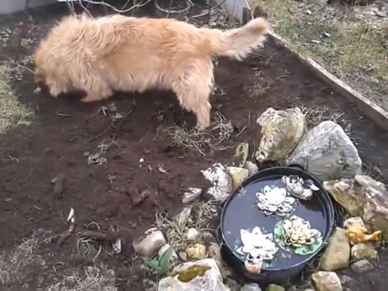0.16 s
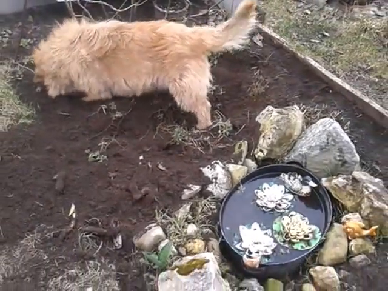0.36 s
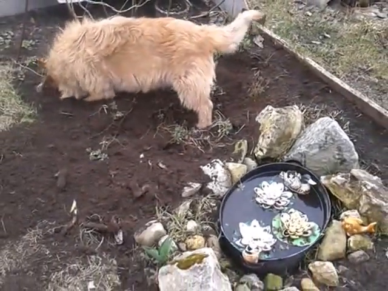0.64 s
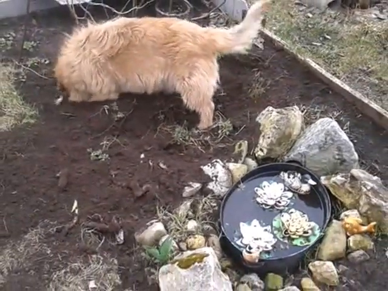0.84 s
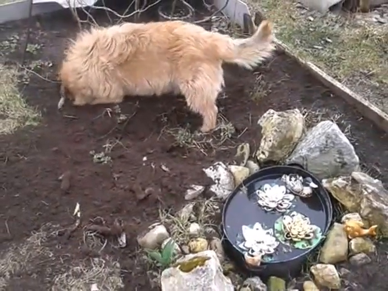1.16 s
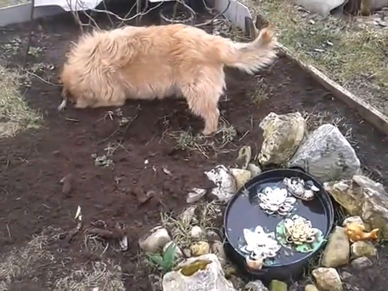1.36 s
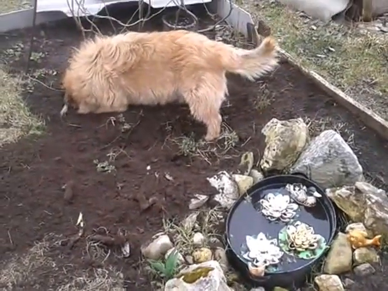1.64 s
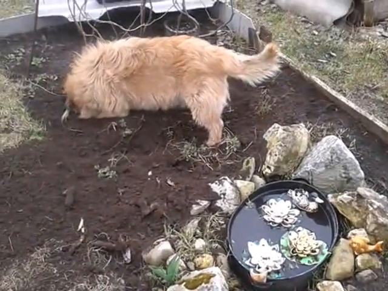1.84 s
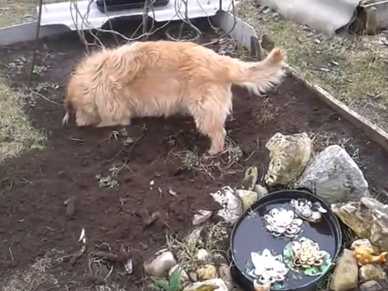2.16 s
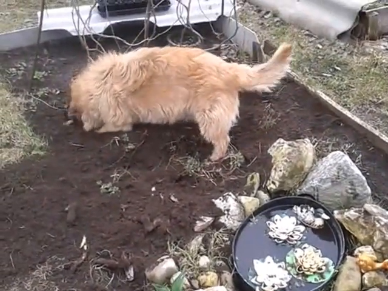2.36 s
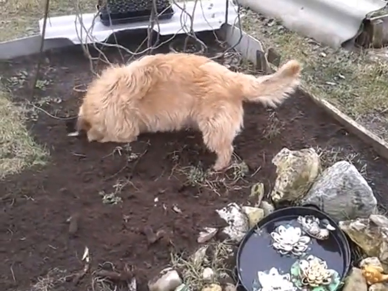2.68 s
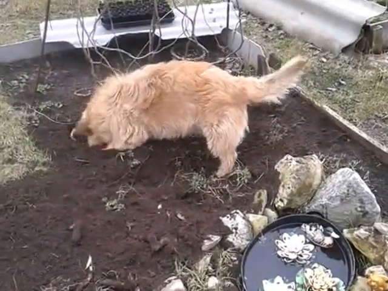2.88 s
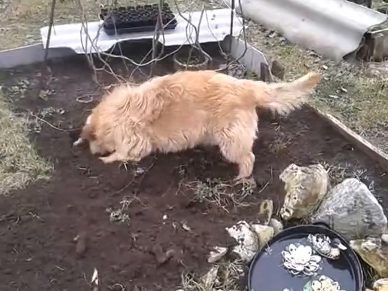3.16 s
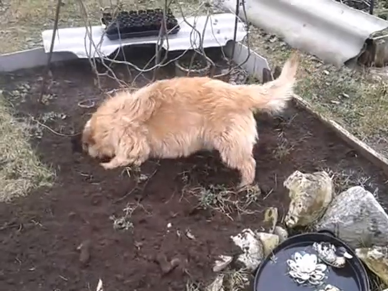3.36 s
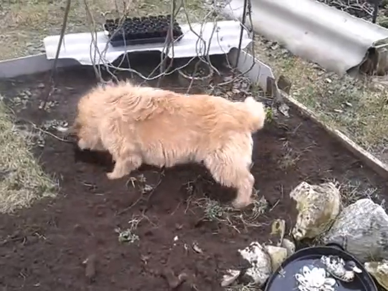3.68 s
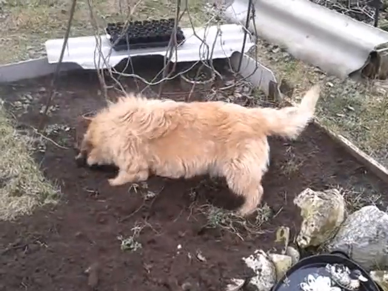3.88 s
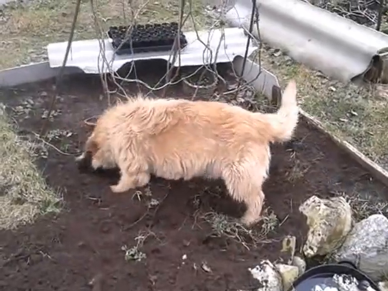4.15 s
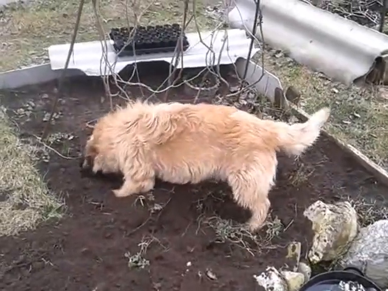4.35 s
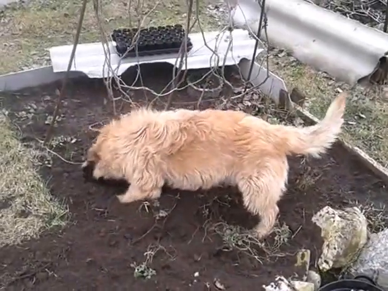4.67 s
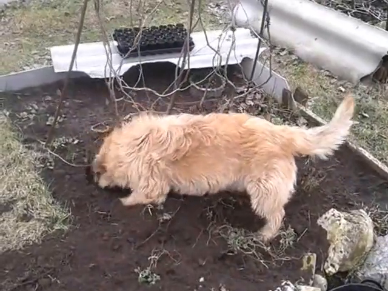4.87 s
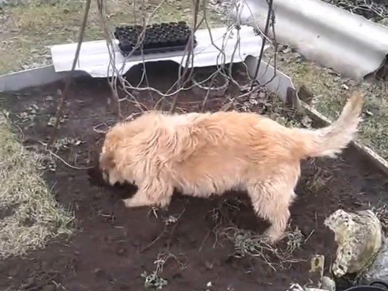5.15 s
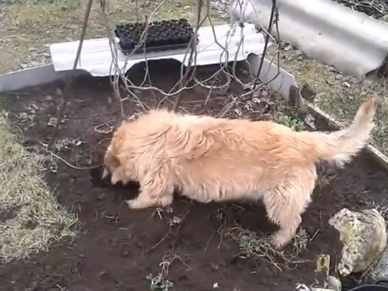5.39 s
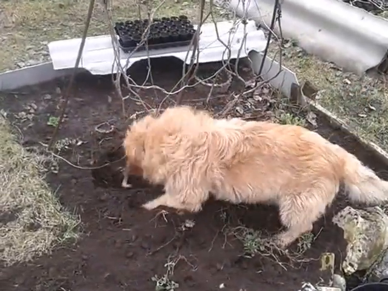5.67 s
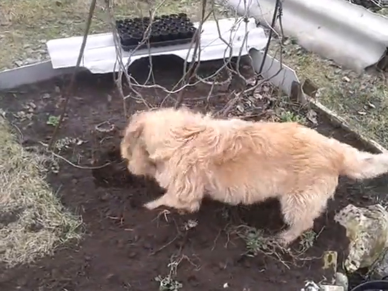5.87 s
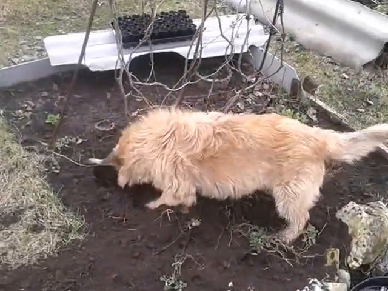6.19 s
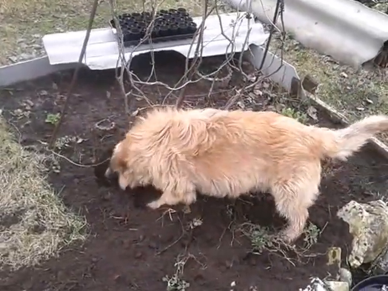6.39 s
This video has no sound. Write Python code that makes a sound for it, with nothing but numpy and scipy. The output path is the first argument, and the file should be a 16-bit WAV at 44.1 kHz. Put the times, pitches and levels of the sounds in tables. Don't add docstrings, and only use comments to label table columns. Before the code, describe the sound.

Crumbly digging scrapes and ticking pebbles outdoors, with a repeating songbird, a rapid bird trill, soft dog sniffs and a sharp twig crack.

```python
import sys
import numpy as np
from scipy import signal
from scipy.fft import rfft, irfft
from scipy.io import wavfile
from scipy.ndimage import uniform_filter1d

SR = 44100
rng = np.random.default_rng(int(sys.argv[2]) if len(sys.argv) > 2 else 0)


def persist_wave(psi):
    counts = np.round(np.clip(psi, -1, 1) * 32767).astype(np.int16)
    wavfile.write(sys.argv[1], SR, np.atleast_2d(counts).T)


def linear_from_db(decibels):
    return 10 ** (np.asarray(decibels, float) / 20)


N = 287877

# (frequency [Hz], density [dB])
HUSH_COLOUR = [(20, -25), (60, -8.5), (250, -3.5), (1200, -2), (2200, -9), (3400, -4), (5000, -8.5),
               (9000, -7.5)]
# (time [s],
# length [s], start [Hz], end [Hz], level [dB])
FAR_WHISTLES = [(.396, .03, 6100, 6700, -54), (.96, .075, 2450, 2150, -65), (1.331, .04, 4550, 4430, -66),
                (1.55, .02, 3600, 2750, -44), (1.558, .04, 2360, 2100, -59), (1.604, .04, 2140, 2300, -59),
                (2.058, .03, 3600, 2750, -44), (2.656, .01, 4400, 5600, -35.5),
                (3.482, .09, 4920, 4520, -55), (4.623, .075, 4260, 4220, -56),
                (4.865, .16, 4260, 4200, -61), (5.07, .025, 4050, 3980, -58),
                (2.654, .009, 6100, 6900, -46), (6.108, .014, 4300, 4700, -58),
                (6.204, .018, 4850, 4050, -56), (6.308, .016, 4550, 4100, -56),
                (6.397, .065, 3620, 3570, -57.5)]
# (time [s], peak level [dB], middle [Hz], ground return [dB], wall return [dB])
EARLY_CHIPS = [
    (.081, -47, 3270, -9, -9),
    (.2605, -44, 3480, -9, -14),
    (.342, -36.5, 3800, -14, -22),
    (0.402, -46, 3310, -10, -14),
    (.461, -50, 3170, -10, -10),
    (0.537, -53, 3260, -4, -4),
]
# (time [s], peak level [dB], middle [Hz], ground return [dB], wall return [dB])
TRILL_CHIPS = [(3.208, -45, 3400, -4, -6), (3.268, -43.5, 3370, -6, -3), (3.331, -39, 3400, -6, -5),
               (3.3908, -41, 3320, -6, -4), (3.4504, -40, 3215, -7, -8), (3.511, -35, 3270, -9, -12),
               (3.5707, -38, 3315, -12, -9), (3.6318, -37.5, 3210, -4, -6), (3.6945, -36.5, 3265, -9, -14),
               (3.7545, -36.5, 3290, -14, -15), (3.8179, -36.5, 3300, -11, -15),
               (3.8795, -38, 3306, -9, -14), (3.9434, -42, 3240, -1, -5), (4.0086, -40, 3284, -2, -11),
               (4.0726, -40.5, 3386, -7, -10), (4.1381, -44, 3226, -2, -3), (4.2044, -38, 3400, -3, -11),
               (4.2752, -41, 3300, 1, -8)]
# (length [s], tail below head [dB])
CHIP_VOICING = [(.02, -4), (.028, -2), (.024, -7), (.02, -4), (.02, -4), (.02, -4), (.02, -4), (.02, -4),
                (.018, -5), (.018, -4), (.019, -3), (.019, -6), (.019, -7), (.018, -5), (.019, -8),
                (.018, -9), (.018, -13), (.018, -10), (.017, -6), (.017, -5), (.016, -7), (.016, -4),
                (.015, -4), (.015, -4)]
# (time [s], chip [dB], held note [dB], rise [dB], slur [dB])
SONG_PHRASES = [
    (1.387, -54, -54, -54, -51),
    (1.527, -45, -46, -49, -47),
    (1.671, -40, -42, -45, -44),
    (1.816, -37, -39.5, -49, -46),
    (1.969, -39, -45, -47, -44),
    (2.122, -37, -51, -47, -45.5),
    (2.273, -36, -48, -46, -42.5),
    (2.422, -35, -50, -46.5, -41.5),
    (2.584, -36, -44, -46, -42.5),
]
# (pitch [factor], wall return of chip [dB], of held note [dB], of rise [dB], of slur [dB])
SONG_PERCH = [(1.012, -6, 0, -3, -8), (1.012, -3, 1, 0, -9), (1.01, -4, -10, 2, -6),
              (1.001, -2, -13, -12, -4), (.99, -2, -6, -6, -8), (.975, -5, -5, -1, -15),
              (.97, -6, 2, -7, -8), (.98, -13, -6, -8, -14), (.975, -14, -10, -10, -12)]
# (time [s], level [dB], thick part [dB])
TWIG_CRACKS = [
    (5.4676, -24, 4),
    (5.468, -8, 4),
    (5.4691, -16, 0),
    (5.47, -6.5, -1),
    (5.4705, -12, 0),
    (5.4711, -11, -1),
    (5.4716, -11, -3),
    (5.4727, -25, 0),
    (5.4741, -25, -4),
    (5.4754, -27, -4),
]
# (frequency [Hz], level [dB], t60 [s])
TWIG_RINGS = [(1050, -1, 0.008), (1380, 2, 0.007), (1700, 4.5, 0.004), (2000, -2, .005), (2500, -4, 0.003),
              (3300, 0, 0.0035), (4400, -3, 0.006), (5600, 3.5, 0.0045), (6700, 2, 0.0028)]
# (time [s], peak level [dB], ring [Hz], bright part [dB])
PEBBLE_TICKS = [(0.33, -45, 1650, -12), (0.467, -47.5, 1520, -12), (0.554, -45.5, 1350, -12),
                (1.215, -58, 1300, -9.5), (1.768, -37.5, 1310, -1), (2.17, -39, 1660, -10),
                (2.6, -39, 1470, -9), (2.93, -40, 1580, -8), (3.308, -47, 1480, -11),
                (3.389, -35, 1017, -14), (3.415, -39.5, 923, -15), (3.443, -39, 1660, -12),
                (3.477, -44, 1610, -9), (3.599, -29.5, 2080, -12), (3.946, -46, 670, -9),
                (3.994, -45, 641, -10), (4.334, -39.5, 1370, -8), (4.6, -47, 530, -12),
                (4.859, -33, 1180, -22), (5.722, -45, 1330, -22), (5.935, -46, 1000, -12),
                (6.458, -50, 1180, -12), (1.721, -45, 1430, -10), (2.114, -49, 1660, -12),
                (2.211, -47, 1670, -12), (3.499, -45, 1680, -8), (3.559, -49, 1780, -12),
                (3.827, -47, 1900, -3), (4.309, -49, 1590, -12), (4.367, -47, 1450, -12),
                (5.129, -51, 1380, -8), (5.294, -41, 1530, -2), (5.319, -48, 1600, -1),
                (5.566, -53, 1750, -12), (6.189, -46, 1800, -8)]
# (time [s], peak level [dB], ring [Hz])
GRIT_FLICKS = [(0.1066, -42, 4120), (0.2917, -36, 6630), (0.34, -45, 4200), (0.9551, -40, 6000),
               (1.153, -40, 5930), (2.584, -45, 5300), (3.1283, -56, 6160), (3.307, -33, 5200),
               (3.389, -34, 6400), (3.4141, -40, 4370), (3.4431, -38, 4420), (3.466, -47, 7040),
               (3.501, -32, 4810), (3.5953, -22.5, 6750), (3.9957, -41, 6070), (4.1815, -37.5, 6880),
               (4.3432, -22, 6100), (5.13, -25, 6120), (5.55, -52, 6140), (5.6263, -36.5, 6060),
               (6.0811, -39.5, 6130), (6.1905, -20, 5740), (6.2974, -40, 6100), (6.355, -34.5, 6100),
               (.046, -28, 4500), (.5272, -46, 4190), (.8425, -52, 5660), (2.707, -28, 5100),
               (2.9307, -43, 4300), (3.3608, -42, 6350), (3.6182, -30, 5620), (3.8018, -44, 6840),
               (4.3435, -35, 3700), (4.8725, -34, 6100), (2.181, -41, 6900), (5.1305, -42, 4000),
               (4.3974, -39, 6460), (5.284, -36, 5900), (5.305, -36, 6500), (5.435, -46, 6300),
               (5.446, -46, 6700), (3.415, -40, 6500), (3.3895, -41, 4600), (3.317, -36, 6500),
               (.351, -42, 6600), (3.8262, -40, 6410)]
# (time [s], length [s], level [dB])
SNIFF_PUFFS = [
    (4.705, .08, -52),
    (4.815, .085, -49.5),
    (4.92, .07, -51),
    (5.06, .05, -55),
]
# (frequency [Hz], width [Hz], level [dB])
NOSE_RINGS = [(1600, 500, -8), (3350, 700, -2.5), (6500, 1100, 0)]
# (time [s], peak level [dB], start [Hz], end [Hz], length [s])
PAW_SWIPES = [(0.034, -33, 4600, 4350, 0.028), (.184, -42, 3800, 3850, .009),
              (0.044, -41, 3100, 1700, 0.028), (.032, -44, 6540, 6550, 0.019),
              (0.171, -40.5, 6850, 6800, 0.022), (0.174, -42, 3400, 3900, 0.03),
              (.172, -45, 5600, 5500, .02), (.034, -41, 3550, 3300, .025), (0.183, -53, 2600, 2000, 0.027),
              (1.212, -66.5, 1250, 1230, 0.17), (1.937, -49.5, 1165, 1080, 0.12),
              (2.61, -63, 283, 280, .14), (2.06, -47, 3550, 3400, .07), (2.69, -36.5, 5200, 5030, 0.033),
              (2.69, -37, 6500, 6440, 0.029), (3.307, -44, 6400, 6640, .022),
              (3.594, -41, 6830, 6700, 0.012), (3.619, -34, 5440, 5300, .034),
              (3.637, -40, 4000, 3300, .035), (5.276, -43.5, 6300, 6400, 0.057),
              (5.751, -48, 3630, 3230, 0.044), (5.982, -49, 6000, 6200, 0.02),
              (6.071, -55, 660, 650, 0.014), (6.102, -48, 6100, 5930, 0.022),
              (6.297, -48, 6200, 6100, .014), (5.802, -58, 3600, 3620, .25),
              (0.846, -63.5, 5600, 6360, .06), (.018, -50, 3300, 3000, .018), (.07, -49, 6300, 6400, .025),
              (.143, -52, 3300, 3100, .016), (.205, -46, 6100, 6300, .03), (.908, -60, 3100, 2700, .012),
              (3.29, -48, 4500, 4300, .02), (5.185, -47, 3750, 3900, .008), (5.416, -48, 6800, 6900, .008),
              (5.74, -53, 6000, 5900, .05), (6.196, -46, 6200, 6000, .018), (6.0, -60, 3600, 3500, .07),
              (6.49, -52, 6800, 6600, .04),
              (2.599, -48, 2500, 2400, .012), (2.602, -55, 300, 260, .018), (2.656, -56, 300, 270, .015),
                (2.656, -49, 1400, 1350, .03), (2.716, -50, 1420, 1380, .014),
                (2.068, -52, 3000, 2850, .022), (3.613, -46, 2750, 2600, .035),
                (5.75, -53, 1800, 1950, .035), (6.108, -50, 4500, 4500, .012),
                (6.203, -49, 4600, 4300, .016), (6.307, -50, 4450, 4250, .014), (6.3, -58, 2700, 2600, .03),
                (5.99, -56, 4500, 4300, .03), (3.828, -50, 1500, 2000, .03)]
# (frequency [Hz], width [Hz], level [dB])
GRIT_RINGS = [(4430, 2700, 5), (5600, 460, 0.5), (6400, 2450, 4), (7000, 760, -3.5)]
CRUMB_RINGS = [(2340, 1000, 0.62), (3426, 740, 4.4)]
CLOD_RINGS = [(789, 200, -5), (980, 570, -4), (1402, 260, 0.5), (1640, 255, 1.5), (1985, 430, -3.5)]
EARTH_RINGS = [(294, 123, -11), (413, 137, -4.5), (520, 123, 2.5), (691, 260, -0.5)]
# (offset [dB], effort share [ratio], depth share [ratio], looseness share [ratio], clumping [dB])
SOIL_SIZES = [
    (0, 1.0, .01, .01, 1.17),
    (-5, 1.05, .2, 1.0, 1.1),
    (-6, .9, 1.0, .05, .4),
    (-10.8, .4, .35, .42, .6),
]
# (time [s], effort [dB], depth [dB], looseness [dB])
SOIL_TRICKLE = [(.2, -54, 1, 1), (.61, -60, 1, 3), (.8, -84, 5, -12), (.9, -61, -2, 0), (1.07, -72, 3, -8),
                (1.45, -66, 2, -5), (1.72, -58, 8, -7), (2.5, -61, 6, 7), (2.8, -54, 2, 5),
                (3.75, -60, 2, 2), (3.92, -63, -2, -1), (3.96, -61, 7, 5), (4.4, -54, 4.5, 3),
                (4.58, -61, 4, 4), (5.0, -57, 0, -6), (5.65, -56.5, -2, 2), (6.05, -55.5, -10, -1),
                (6.53, -59, -10, -14)]
# (peak time [s], level [dB], build-up [s], die-away [s], depth [dB])
PAW_STROKES = [(0.002, -42, .01, .025, -12), (.044, -38, .012, .09, -13), (.183, -37, .013, .075, -14),
               (1.58, -54, .06, .06, -4), (1.73, -49, .06, .06, 6), (1.82, -46, .015, .08, 0),
               (1.99, -51, .04, .06, 3), (2.21, -52, .1, .2, 0), (2.6, -46.5, .004, .22, 3),
               (2.7, -39, .04, .05, -4), (3.315, -42.5, .07, .015, -8), (3.6, -39, .02, .01, -3),
               (3.625, -37, .012, .09, -14), (3.845, -46.5, .11, .05, -3), (4.34, -49.5, .02, .04, 2),
               (4.86, -48, .05, .03, -2), (5.25, -45, .3, .04, -5), (5.3, -42, .06, .02, -1),
               (5.37, -52, .04, .04, -2), (5.487, -50, .015, .02, 7), (5.515, -46, .025, .035, -8),
               (5.753, -51, .07, .2, 2), (6.2, -52, .015, .06, -22), (6.5, -50.5, .15, .1, -25)]
# (frequency [Hz], level [dB])
RECORDER_EDGE = [(6950, 0), (7320, -6), (7660, -18), (8250, -29), (8400, -65.5), (8700, -95)]


def evened(x):
    return x / np.sqrt(np.mean(x ** 2) + 1e-20)


def add(mix, start_s, sound):
    part = mix[round(start_s * SR):][:len(sound)]
    part += sound[:len(part)]


def cavity(x, hz, width_hz):
    pole = np.exp((2j * hz - width_hz) * np.pi / SR)
    return signal.lfilter([1], [1, -2 * pole, pole ** 2], x * (1 + 0j)).real


def sliding_cavity(x, hz, width_hz):
    turn = np.exp(2j * np.pi * np.cumsum(hz * np.ones(len(x))) / SR)
    r = np.exp(-np.pi * width_hz / SR)
    smooth = signal.lfilter([(1 - r) ** 2], [1, -2 * r, r * r], x / turn)
    return 2 * (turn * smooth).real


def ring(hz, t60):
    t = np.arange(1500) / SR
    contact = np.minimum(t / 0.00022, 1)
    return np.sin(2 * np.pi * hz * t) * linear_from_db(-60 * t / t60) * contact


def whistle(length_s, start_hz, end_hz, bend=1.25, lean=0.99):
    u = np.linspace(0, 1, round(length_s * SR))
    hz = start_hz + (end_hz - start_hz) * u ** bend
    shape = np.sin(np.pi * u ** lean)
    hoarse = linear_from_db(2.4 * evened(uniform_filter1d(rng.standard_normal(len(u)), size=120)))
    steady = np.linalg.norm(shape) / np.linalg.norm(shape * hoarse)
    return np.sin(2 * np.pi * np.cumsum(hz) / SR) * shape * hoarse * steady


def crumble(count, per_s, spread_db):
    size = linear_from_db(spread_db * np.minimum(rng.exponential(1, count), 5))
    return size * rng.standard_normal(count) * (rng.random(count) < per_s / SR)


def wall(x, echoes, haze_db, t60):
    t = np.arange(SR // 2) / SR
    haze = evened(crumble(len(t), 1800, 2.1) * linear_from_db(-60 * t / t60))
    taps = haze * linear_from_db(haze_db) / np.sqrt(len(t))
    taps[0] = 1
    for delay_s, db in echoes:
        taps[round(delay_s * SR)] = linear_from_db(db)
    return signal.oaconvolve(x, taps)[:N]


def hush():
    hz, db = np.transpose(HUSH_COLOUR)
    f = np.fft.rfftfreq(N, 1 / SR)
    colour = linear_from_db(np.interp(np.log(f + 1), np.log(hz + 1), db))
    return linear_from_db(-59) * evened(irfft(colour * rfft(rng.standard_normal(N)), N))


def far_birds():
    out = np.zeros(N)
    for s, length_s, start_hz, end_hz, db in FAR_WHISTLES:
        add(out, s, linear_from_db(db) * whistle(length_s, start_hz, end_hz, bend=0.9, lean=0.6))
    return wall(out, [], -6.5, 0.23)


def triller():
    out = np.zeros(N)
    for (s, db, hz, ground_db, wall_db), (length_s, tail_db) in zip(EARLY_CHIPS + TRILL_CHIPS, CHIP_VOICING):
        paths = ((-0.0035, 2.5, 0.33),
                 (0.0052, ground_db + 4.0, 0.58),
                 (0.0348, wall_db + 3.3, 0.4))
        for delay_s, path_db, loudest_at in paths:
            chip = whistle(length_s, 1.09 * hz, 0.72 * hz, bend=1.35, lean=0.85)
            u = np.linspace(0, 1, len(chip))
            head = np.exp(-((u - loudest_at) / 0.23) ** 2)
            add(out, s + delay_s, linear_from_db(db + path_db) * chip * np.maximum(head, linear_from_db(tail_db)))
    return wall(out, [], -6.5, 0.38)


def songbird():
    out = np.zeros(N)
    for phrase, perch in zip(SONG_PHRASES, SONG_PERCH):
        s, chip_db, held_db, rise_db, slur_db = phrase
        pitch, chip_back, held_back, rise_back, slur_back = perch
        notes = (
            (-0.001, 0.006, 5250, 7300, 1.3, 0.75, chip_db, chip_back, 0.42),
            (0.007, 0.021, 5660, 5540, 0.9, 1.2, held_db, held_back, 1),
            (0.0245, 0.028, 3950, 5300, 2.1, 1.05, rise_db + 2.2, rise_back, 1),
            (0.051, 0.04, 5120, 5050, 0.6, 1.2, rise_db - 6, rise_back, 1),
            (0.0625, 0.043, 3410, 3980, 0.95, 2.05, slur_db + 0.1, slur_back, 1),
            (0.049, 0.014, 5000, 4050, 0.7, 1.1, rise_db - 7, rise_back, 1),
            (0.102, 0.05, 3720, 3560, 0.6, 0.6, slur_db - 12, slur_back, 1))
        for delay_s, length_s, start_hz, end_hz, lean, bend, db, back_db, echo_lean in notes:
            vary_hz = 0.04 * (end_hz - start_hz) * rng.standard_normal()
            start_hz = pitch * start_hz + vary_hz
            for late_s, path_db, tilt in ((0, 0, 1), (0.0445, back_db, echo_lean)):
                note = whistle(length_s, start_hz, pitch * end_hz, bend=bend, lean=lean * tilt)
                add(out, s + delay_s + late_s, linear_from_db(db + path_db) * note)
    return wall(out, [(0.0055, -7)], -4, 0.34)


def twig():
    thick, thin = 0, 0
    for k, (hz, db, t60) in enumerate(TWIG_RINGS):
        mode = (-1) ** (k + 1) * linear_from_db(db) * ring(hz, t60)
        if hz < 2200:
            thick = thick + mode
        else:
            thin = thin + mode
    out = np.zeros(N)
    for s, db, thick_db in TWIG_CRACKS:
        add(out, s, linear_from_db(db - 9) * (thin + linear_from_db(thick_db) * thick))
    return out


def ticks():
    out = np.zeros(N)
    for s, db, hz, bright_db in PEBBLE_TICKS:
        dull = ring(hz, 0.014) - 0.8 * ring(1.6 * hz, 0.008) + 0.4 * ring(2.5 * hz, 0.005)
        bright = ring(6400, 0.0048) + 0.6 * ring(5800, 0.004)
        add(out, s, linear_from_db(db + 1.5) * (dull + linear_from_db(bright_db) * bright))
    for s, db, hz in GRIT_FLICKS:
        add(out, s, linear_from_db(db + 4.0) * (ring(hz, 0.0034) + 0.5 * ring(0.7 * hz, 0.0013)))
    return out


def small_objects():
    near = wall(ticks(), [(0.019, -22)], -12, 0.24) + wall(twig(), [(0.019, -26.5)], -20, 0.24)
    return signal.sosfilt(signal.butter(4, 420, "high", fs=SR, output="sos"), near)


def sniffs():
    out = np.zeros(N)
    for s, length_s, db in SNIFF_PUFFS:
        arch = np.sin(np.pi * np.linspace(0, 1, round(length_s * SR)))
        air = rng.standard_normal(len(arch))
        flare = 1 + 0.08 * (arch - 0.7)
        puff = sum(linear_from_db(g) * evened(sliding_cavity(air, hz * flare, width)) for hz, width, g in NOSE_RINGS)
        add(out, s, linear_from_db(db) * puff * arch ** 0.7)
    return out


def swipes():
    out = np.zeros(N)
    for s, db, start_hz, end_hz, length_s in PAW_SWIPES:
        u = np.linspace(0, 1, round(1.67 * length_s * SR))
        grit = crumble(len(u), 14000, 2.8)
        rush = sliding_cavity(grit, start_hz + (end_hz - start_hz) * u, 0.19 * start_hz)
        add(out, s - 0.2 * length_s, linear_from_db(db) * evened(rush) * np.sin(np.pi * u ** 0.55) ** 2)
    return out


def soil_level(offset_db, by_effort, by_depth, by_loose):
    reference_db, packed_db = -55, -2.5
    t = np.arange(0, N + 64, 64) / SR
    s, effort, depth, loose = np.transpose(SOIL_TRICKLE)
    trickle_db = by_effort * (effort - reference_db) + by_depth * depth + by_loose * loose
    rows = [np.interp(t, s, trickle_db)]
    for s, db, rise_s, fall_s, depth in PAW_STROKES:
        away = np.where(t < s, (s - t) / rise_s, (t - s) / fall_s)
        peak_db = by_effort * (db - reference_db) + by_depth * depth + by_loose * packed_db
        rows.append(peak_db - 16 * away)
    level = np.sqrt(np.sum(linear_from_db(np.maximum(rows, -200)) ** 2, axis=0))
    return linear_from_db(reference_db + offset_db) * np.interp(np.arange(N) / SR, t, level)


def digging():
    clumps = evened(uniform_filter1d(uniform_filter1d(rng.standard_normal(N), 500), 500))
    shared = evened(crumble(N, 3000, 2.8))
    out = np.zeros(N)
    for (*shares, clump_db), rings in zip(SOIL_SIZES, (GRIT_RINGS, CRUMB_RINGS, CLOD_RINGS, EARTH_RINGS)):
        grains = (0.51 * shared + evened(crumble(N, 9000, 1.3))) * linear_from_db(clump_db * clumps)
        layer = np.zeros(N)
        for k, (hz, width_hz, db) in enumerate(rings):
            layer += (-1) ** k * linear_from_db(db) * evened(cavity(grains, hz, width_hz))
        out += evened(layer) * soil_level(*shares)
    return out


def scene():
    birds = far_birds() + triller() + songbird()
    dog = small_objects() + sniffs() + swipes() + digging()
    mono = hush() + birds + dog
    return np.array([mono, mono])


def low_pass(x):
    return signal.sosfilt(signal.butter(12, 8390, fs=SR, output="sos"), x)


def record(dry):
    edge_db = np.interp(np.fft.rfftfreq(N, 1 / SR), *np.transpose(RECORDER_EDGE))
    mix = irfft(rfft(dry) * linear_from_db(edge_db), N)
    return low_pass(mix)


dry = scene()
out = record(dry)
persist_wave(out)
```